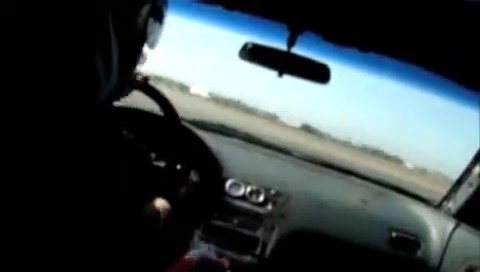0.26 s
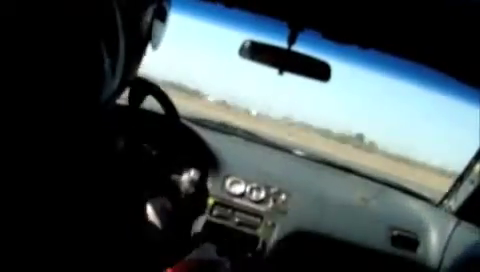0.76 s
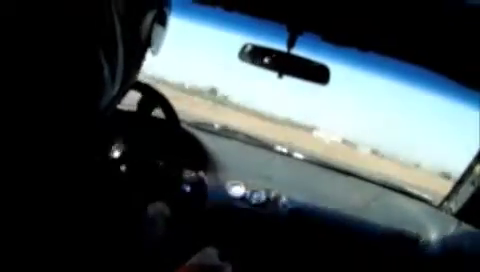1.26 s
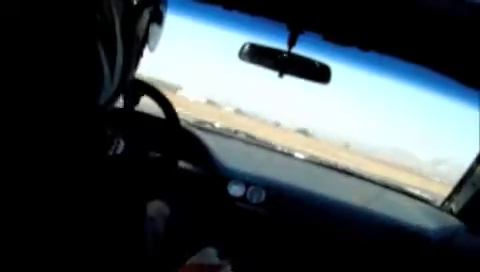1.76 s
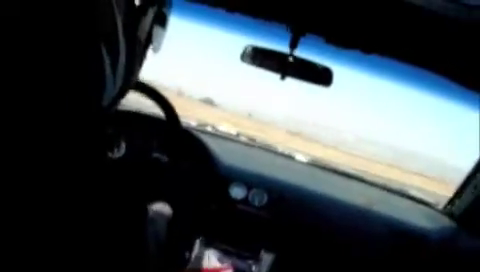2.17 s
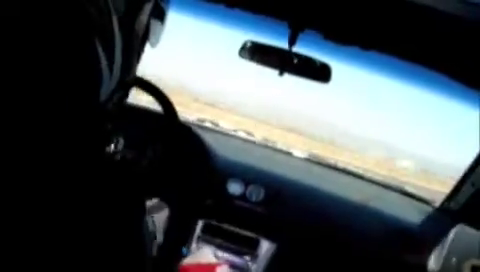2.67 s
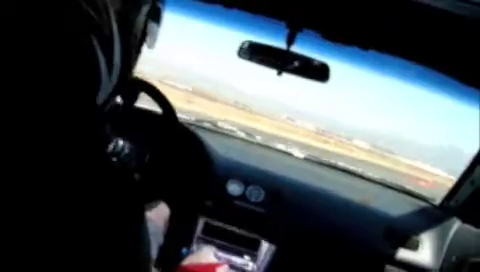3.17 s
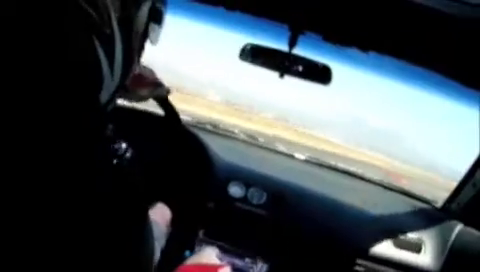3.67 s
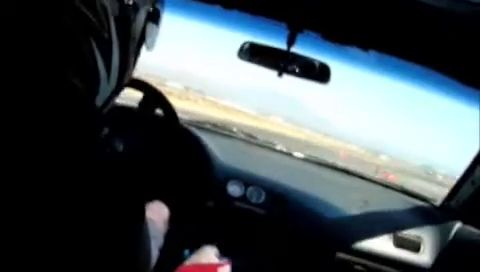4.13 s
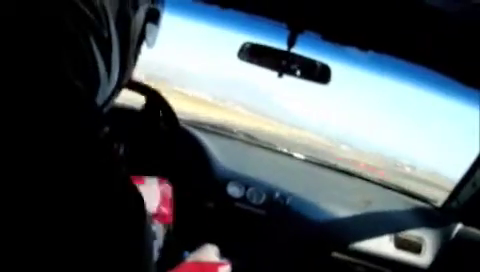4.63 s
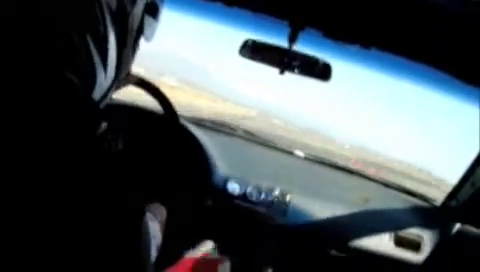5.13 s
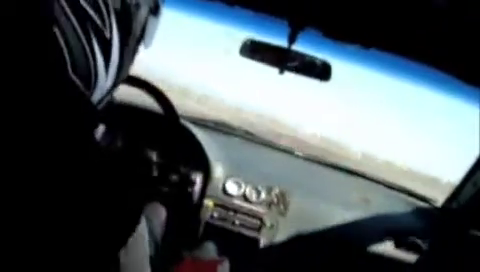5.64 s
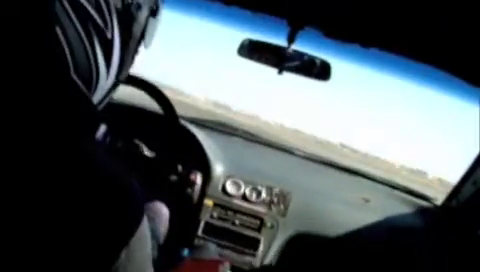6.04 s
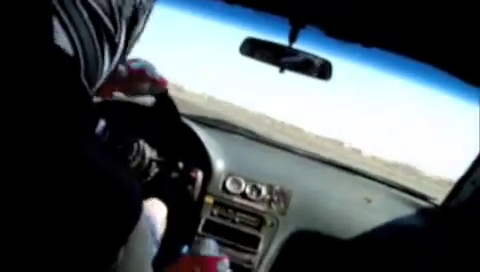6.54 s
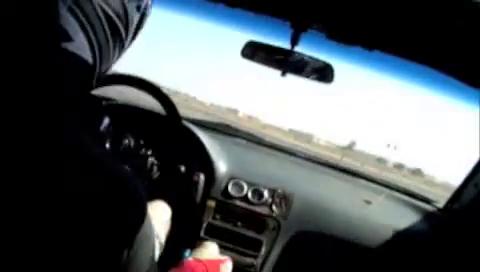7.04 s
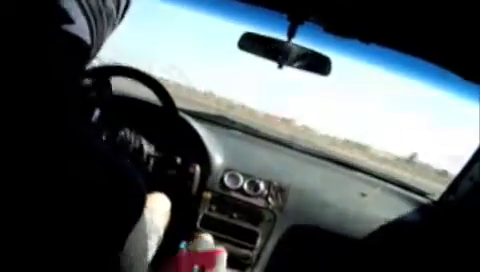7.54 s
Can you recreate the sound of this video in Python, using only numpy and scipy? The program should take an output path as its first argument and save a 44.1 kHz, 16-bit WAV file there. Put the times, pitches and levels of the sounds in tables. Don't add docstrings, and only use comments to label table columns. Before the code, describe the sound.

Long wavering tyre squeal fills a bare cabin above a loud four-cylinder drone, with trim buzzes, floor knocks and a final throttle lift.

```python
import sys
import numpy as np
from scipy import signal
from scipy.io import wavfile
from scipy.ndimage import uniform_filter1d

SR = 44100
rng = np.random.default_rng(int(sys.argv[2]) if len(sys.argv) > 2 else 0)


def put_to_file(sound):
    columns = np.atleast_2d(sound).T
    safe = np.clip(columns, -1, 1)
    whole_steps = np.round(safe * 32767)
    wavfile.write(sys.argv[1], SR, whole_steps.astype(np.int16))


def convert_level_to_amplitude(level_db):
    exponent = np.asarray(level_db, float) / 20
    return 10 ** exponent


N = 343960

# t/s, level/dB, length/s, f/Hz
BUMPS = [(0.107, -44, 0.024, 304), (0.854, -24.5, 0.036, 329.9), (0.967, -32.5, 0.085, 331.4),
         (5.336, -30, .12, 449.6), (6.267, -24.5, 0.13, 748.3), (7.115, -42, 0.046, 100),
         (7.725, -29, 0.1, 900), (7.751, -25, 0.1, 600), (7.399, -53, 0.33, 70), (0.754, -39, 0.091, 4107),
         (1.498, -34, 0.054, 4030), (2.49, -38.5, 0.069, 4470)]
# t/s, level/dB, length/s
RATTLES = [(4.96, -19, 0.018), (4.987, -12, 0.018), (5.044, -17.5, 0.048), (5.486, -11.5, 0.032),
           (5.501, -24, 0.087), (5.5994, -18, 0.025), (5.841, -16, 0.014), (5.86, -12.5, 0.022),
           (5.908, -14, 0.0083), (5.926, -17.5, 0.034), (6.604, -9, 0.028), (6.6624, -13, 0.016),
           (7.641, -24, 0.056), (7.685, -19, 0.0075), (7.721, -21, 0.059)]
# t/s, level/dB
SCRUB_LEVEL = [(0.0, -30.5), (0.95, -26.5), (1.3, -28), (2.52, -27), (2.89, -27.5), (3.82, -27),
               (4.26, -28), (5.08, -28), (5.3, -28), (7.17, -27.5), (7.49, -35), (7.8, -38)]
# f/Hz, level/dB per Hz
SCRUB_SPECTRUM = [(300, -27), (500, -8.5), (800, -3.5), (1300, 3), (1800, 4.5), (2600, -5), (3500, -5.5),
                  (5000, -12.5), (7000, -20), (10000, -25.5)]
# f/Hz, level/dB per Hz
RUMBLE_SPECTRUM = [(25, -24), (50, -24), (80, -20), (110, 12), (240, -10), (330, 6.5), (450, -6.5),
                   (700, 1.5), (1000, -5.5), (2000, -37)]
# middle t/s, half length/s, gain/dB
JOLTS = [(.35, .25, 6), (.66, .06, -6), (.92, .12, 5), (2.95, .2, 1.5), (3.5, .2, 3), (4.2, .08, 4),
         (4.6, .15, 3), (5.45, 0.33, 7.5), (6.32, .08, 5.5), (6.6, .15, 3.5), (7.25, .1, -2),
         (7.8, 0.11, 9)]
# middle t/s, half length/s, squeal drop/dB, grit/dB
RIDGES = [(2.39, 0.013, 9, -1), (2.93, 0.027, 0.5, -1), (4.3, 0.033, 4, -3), (4.41, 0.034, -3.5, 1),
          (4.51, 0.019, -5, 0.5), (4.54, 0.023, 3, 0), (4.66, 0.061, -3, 1), (5.06, .02, -4, -4),
          (6.13, .06, -1, 0.5), (5.02, .03, 7, 9), (5.1, .02, 4, 3.5), (5.49, 0.066, 8, 4),
          (5.88, 0.045, -0.5, 3.5), (6.62, 0.069, 2.5, 4.5), (7.66, .08, 0.1, 6)]
# middle t/s, half length/s, octave gain/dB, scrub gain/dB
BITES = [(.59, 0.032, 13, 0.5), (.8, 0.043, 4, 0), (1.52, 0.045, 8, 2), (1.8, .04, 4, 2),
         (2.5, .05, 1.5, 1), (3.8, 0.11, 2.5, 0.5), (4.3, .04, 7, 1.5), (4.98, .05, 5, 1.5),
         (5.22, .06, -6, 0.5), (6.1, 0.059, 3, 1), (7.63, 0.06, -1, -2), (7.8, 0.083, -2, 5)]
# t/s, f/Hz (cycles per second)
POWER_REVS = [(0.0, 34.76), (0.44, 36.85), (0.67, 36.68), (1.41, 38.1), (1.94, 37.35), (2.72, 37.7),
              (2.97, 38.6), (3.21, 40.38), (3.37, 39.77), (4.18, 41.28), (4.44, 39.8), (4.68, 39.7),
              (5.12, 40.42), (5.69, 43.03), (6.07, 44.05), (6.37, 40.68), (6.94, 44.35), (7.12, 44.0)]
# t/s, f/Hz (cycles per second)
COAST_REVS = [
    (7.172, 39.19),
    (7.41, 33.05),
    (7.588, 31.28),
    (7.708, 32.06),
    (7.8, 34.7),
]
# f/Hz, level/dB
FIRING_BOOM = [(125, -39), (133, -43.5), (142, -41.5), (151, -39.5), (159, -33), (166, -26.5), (176, -28.5)]
# f/Hz, level/dB
OCTAVE_BOOM = [(250, -53), (275, -43), (298, -49.5), (308, -40.5), (320, -34), (332, -27.5), (350, -29.5)]
# middle t/s, half length/s, firing tone drop/dB, octave drop/dB
LIFTS = [
    (.0, .08, 6, 3),
    (1.52, 0.098, 9, 3),
    (2.93, 0.13, 6.5, 0),
    (4.05, 0.27, 3.5, 2.5),
    (4.37, .11, 7, 9),
    (4.6, 0.17, -1, -1),
    (2.7, 0.18, -2, -5.5),
    (6.25, 0.14, 14.5, 3),
    (6.66, 0.067, 9, 6.5),
    (7.12, 0.073, 8, 0),
]
BUZZ_LEVELS = [-29, -36, -10.5, -9.5, -20, -19.5, -10.5, -21.5, -12.5, -3.5, -0.5, -2.5, -10, -6, -4.5, -4,
               -7, -10, -13, -17.5, -10.5]
# f/Hz, width/Hz, level/dB
PANELS = [(729, 40, 3.5), (454.6, 4.4, 7)]
# f/Hz, width/Hz
LOOSE_PANELS = [(562, 11.6), (755, 44)]
LOOSE_LEVELS = [-26, -29]
# middle t/s, half length/s, low panel gain/dB, high panel gain/dB
TWISTS = [(.06, 0.08, 7.5, -12), (.75, .15, -7, -2), (1.5, .12, -6, 2), (2.27, .05, -10, 0.5),
          (3.3, 0.39, -6.5, 1), (4.0, 0.23, -5, -1), (4.43, 0.069, 2, -1), (5.02, .2, 1.5, 10),
          (5.8, .15, 3, 0.5), (6.2, 0.0581, 3.5, -5), (6.47, 0.11, -5, 10.5), (6.82, .06, 3.5, -6)]
# t/s, octave f/Hz, octave level/dB, fundamental level/dB
CHIRP = [
    (7.17, 2310, -34, -16),
    (7.2, 2300, -23, -19),
    (7.3, 2265, -22, -25.5),
    (7.4, 2240, -28.5, -19),
    (7.44, 2249, -19.5, -31),
    (7.475, 2240, -36, -21),
    (7.55, 2215, -26, -27),
    (7.6, 2230, -35, -38),
    (7.64, 2212, -47, -44),
]
# t/s, squeal level/dB, middle f/Hz, pitch spread over the tread/0-1, octave re fundamental/dB
SLIDE = [(0, -16.5, 1390, 0.17, -2), (.16, -14.5, 1126, .12, -7.5), (.42, -15.5, 1373, 0.16, -5),
         (.6, -15.5, 1171, 0.15, -11.5), (.78, -15, 1312, 0.13, -3), (1.0, -16, 1230, .1, -5),
         (1.95, -16, 1225, .11, -5), (2.5, -16, 1312, 0.1, -1), (2.72, -17, 1221, 0.1, -2),
         (3.1, -16.5, 1322, 0.09, -6), (3.8, -19.5, 1369, .06, -1), (4.25, -17.5, 1333, 0.1, -5),
         (5.0, -18.5, 1370, .06, -4.5), (5.5, -20.5, 1278, .12, -12), (6.55, -15.5, 1224, 0.11, -12),
         (6.75, -19, 1341, 0.12, -3), (7.36, -16, 1143, 0.12, -2), (7.6, -20.5, 1140, 0.11, -14)]
# f/Hz, width/Hz, level/dB
CABIN_MODES = [(1053, 44, -2), (1098, 30, 1.5), (1195, 21, -0.5), (1231, 65, -5.5), (1300.4, 21, 1),
               (1394.4, 13, 7.5), (1541, 49, -1.5), (1678, 24, -11), (1975, 23, 7.5), (2109, 24.5, 5.5),
               (2102, 23, 1.5), (2235, 40, 3), (2345, 53, 6), (2434, 44, 0), (2525, 62, 3.5),
               (2693, 15, 12), (2840, 67, -12)]
# f/Hz, width/Hz, depth/0-1
HOLLOWS = [(908, 52, 0.5), (1130, 20, 0), (1196, 20, 0.46), (1955, 133, 0.58), (2094, 63, 0.89),
           (2361, 77, 0.59), (2517, 39, 0.9), (2691, 33, 0.94), (2833, 17, 0.18)]

SHUT_S, SHUT_FALL_S, OPEN_S, OPEN_RISE_S = 7.09, 0.067, 7.7, 0.082
SHUT_BOOM_DB, SHUT_BUZZ_DB = -8, -10
BUZZ_DB, BUZZ_DB_PER_HZ = -33.5, 0.4
THIRD_DB = -54
GRIP_S, GRIP_DB_PER_S = 7.58, -170
WHEEL_HZ, HOP_HZ = 11, 26.0
OCTAVE_SWAY_DB, SURGE_DB = 2, 1.0
TOP_DB, TOP_DB_PER_HZ = -11, 0.35
RUMBLE_DB, RUMBLE_DB_PER_HZ = -48, 0.5
REF_CYCLE_HZ = 40
EDGE_HZ = 10110


def evened(x):
    return x / np.sqrt(np.mean(x ** 2) + 1e-20)


def steady(x, size):
    return x / np.sqrt(abs(uniform_filter1d(x ** 2, size=size)) + 1e-9)


def columns(rows, t=None):
    if t is None:
        t = np.arange(N) / SR
    s, *cols = np.transpose(rows)
    return [np.interp(t, s, c) for c in cols]


def humps(events, t):
    s, half_s, *depths = np.transpose(events)
    coarse = np.arange(0, N / SR + .02, .002)
    bells = np.exp(-((coarse[:, None] - s) / half_s) ** 2)
    return [np.interp(t, coarse, bells @ d) for d in depths]


def read(points, hz):
    f, value = np.transpose(points)
    return np.interp(np.log(hz + 1), np.log(f + 1), value)


def bursts(events):
    shape = np.zeros(N)
    for s, db, length_s in events:
        part = shape[round(s * SR):][:round(2 * length_s * SR)]
        part += convert_level_to_amplitude(db) * np.exp(-(np.arange(len(part)) / SR / length_s) ** 3)
    return shape


def wobble(hz):
    lowpass = signal.butter(2, min(hz, 600), fs=SR / 32, output="sos")
    coarse = signal.sosfilt(lowpass, rng.standard_normal(N // 32 + 2001))[2000:]
    return np.interp(np.arange(N) / 32, np.arange(len(coarse)), evened(coarse))


def hiss(level_db, patchy_db, flicker_db, grit_db):
    frames, hz = N // 128 + 5, np.fft.rfftfreq(512, 1 / SR)[:, None]
    a, b, patches = rng.standard_normal((frames, 257, 3)).T
    patches = uniform_filter1d(patches, size=7, axis=0)
    patches = evened(uniform_filter1d(patches, size=18, axis=1))
    flicker = evened(uniform_filter1d(rng.standard_normal(frames), size=10))
    grit = evened(uniform_filter1d(rng.standard_normal(frames), size=3))
    field_db = level_db(hz, np.arange(frames) * 128 / SR)
    field_db = field_db + patchy_db * patches + flicker_db * flicker
    field_db += grit_db * grit * np.clip(hz / 7000, 0, 1)
    return signal.istft((a + 1j * b) * convert_level_to_amplitude(field_db), nperseg=512, noverlap=384)[1][:N]


def narrow(x, hz, width_hz):
    return signal.lfilter(*signal.iirpeak(hz, hz / width_hz, fs=SR), x)


def ring(x, modes):
    return x + sum(convert_level_to_amplitude(db) * narrow(x, hz, width_hz) for hz, width_hz, db in modes)


def cabin(x):
    for hz, width_hz, depth in HOLLOWS:
        x = x - depth * narrow(x, hz, width_hz)
    return ring(x, CABIN_MODES)


def bumps():
    noise, out = rng.standard_normal(N), 0
    for s, db, length_s, hz in BUMPS:
        band = signal.butter(2, [hz / 2.4, hz * 2.75], "band", fs=SR, output="sos")
        dull = evened(signal.sosfilt(band, noise))
        out = out + uniform_filter1d(bursts([(s, db, length_s)]), size=300) * dull
    return out


def rattles():
    ticks = rng.standard_normal(N) * convert_level_to_amplitude(1.5 * wobble(300))
    band = signal.butter(2, [3800, 9500], "band", fs=SR, output="sos")
    return convert_level_to_amplitude(-12.0) * bursts(RATTLES) * evened(signal.sosfilt(band, ticks))


def roar():
    def scrub_db(hz, t):
        over_hz = columns(POWER_REVS, t)[0] - REF_CYCLE_HZ
        top_db = TOP_DB + TOP_DB_PER_HZ * over_hz + humps(RIDGES, t)[1]
        treble = np.clip(np.log2(hz / 4200 + 1e-9), 0, 1)
        level_db = columns(SCRUB_LEVEL, t)[0] + humps(BITES, t)[1] + 2.99
        return read(SCRUB_SPECTRUM, hz) + level_db + treble * (top_db + 13.5)

    def rumble_db(hz, t):
        over_hz = columns(POWER_REVS, t)[0] - REF_CYCLE_HZ
        return read(RUMBLE_SPECTRUM, hz) + RUMBLE_DB + humps(JOLTS, t)[0] + RUMBLE_DB_PER_HZ * over_hz

    rumble = hiss(rumble_db, 0.38, 1.0, 0)
    rumble = signal.sosfilt(signal.butter(3, 80, "high", fs=SR, output="sos"), rumble)
    scrub = cabin(hiss(scrub_db, 0.96, 0.94, 0.93))
    return convert_level_to_amplitude(-9.0) * scrub + convert_level_to_amplitude(1.0) * rumble


def loose_panels(shake):
    out = 0
    twists_db = humps(TWISTS, np.arange(N) / SR)
    for (hz, width_hz), db, twist_db in zip(LOOSE_PANELS, LOOSE_LEVELS, twists_db):
        out = out + convert_level_to_amplitude(db + twist_db) * narrow(narrow(shake, hz, width_hz), hz, width_hz)
    return out


def engine():
    t, (cycle_hz,) = np.arange(N) / SR, columns(POWER_REVS + COAST_REVS)
    firing_lift_db, octave_lift_db = humps(LIFTS, t)
    shut = np.interp(t, [SHUT_S, SHUT_S + SHUT_FALL_S, OPEN_S, OPEN_S + OPEN_RISE_S], [0, 1, 1, 0])
    dying_db = SHUT_BOOM_DB * shut * np.clip(cycle_hz - 33, 0, 1)
    firing_db = read(FIRING_BOOM, 4 * cycle_hz) - firing_lift_db + dying_db + 0.88 * wobble(3.9)
    octave_db = read(OCTAVE_BOOM, 8 * cycle_hz) - octave_lift_db + dying_db + 1.2 * wobble(3.8)
    buzz_db = BUZZ_DB + BUZZ_DB_PER_HZ * (cycle_hz - REF_CYCLE_HZ) + SHUT_BUZZ_DB * shut

    angle = 2 * np.pi * np.cumsum(cycle_hz * (1 + .0013 * wobble(12))) / SR
    firing = convert_level_to_amplitude(firing_db) * np.sin(4 * angle)
    octave = convert_level_to_amplitude(octave_db) * np.sin(8 * angle)
    third = convert_level_to_amplitude(THIRD_DB + 2.5 * wobble(2.5)) * np.sin(3 * angle)
    boom = np.sqrt(2) * (firing + octave + third)

    multiples = [k for k in range(5, 27) if k != 8]
    lines = [np.sin(k * angle + 2 * np.pi * rng.random()) for k in multiples]
    buzz = sum(convert_level_to_amplitude(db + 1.4 * wobble(2.5)) * line for line, db in zip(lines, BUZZ_LEVELS))
    unpanelled = buzz - sum(narrow(buzz, *mode) for mode in LOOSE_PANELS)
    shake = convert_level_to_amplitude(SHUT_BUZZ_DB * shut) * sum(lines)
    return boom + ring(convert_level_to_amplitude(buzz_db) * unpanelled, PANELS) + loose_panels(shake)


def chirp():
    t, (octave_hz, octave_db, low_db) = np.arange(N) / SR, columns(CHIRP)
    on = np.interp(t, [CHIRP[0][0], CHIRP[1][0] - .01, CHIRP[-2][0], CHIRP[-1][0]], [0, 1, 1, 0])
    angle = np.pi * np.cumsum(octave_hz * (1 + .026 * wobble(140))) / SR
    tones = convert_level_to_amplitude(low_db + 4) * np.sin(angle) + convert_level_to_amplitude(octave_db + 5.5) * np.sin(2 * angle)
    hop = np.sin(2 * np.pi * np.cumsum(HOP_HZ * (1 + .12 * wobble(6.2))) / SR)
    return on * convert_level_to_amplitude(1.8 * wobble(50) + 3.5 * hop) * tones


def squeal(blocks=6):
    t, (level_db, pitch_hz, spread, bite_db) = np.arange(N) / SR, columns(SLIDE)
    surge_db = SURGE_DB * wobble(7.4)
    level_db = level_db + GRIP_DB_PER_S * np.maximum(t - GRIP_S, 0)
    octave_db = level_db + bite_db + humps(BITES, t)[0] + OCTAVE_SWAY_DB * wobble(3.8) - surge_db
    level_db = level_db + surge_db - humps(RIDGES, t)[0]

    low, high = np.zeros((2, N))
    sway = 0.401 * np.tanh(wobble(27.89))
    for place in np.linspace(-1.1, 1.1, blocks):
        hz = pitch_hz * (1 + spread * (place + sway + .22 * wobble(20)) + .016 * wobble(149))
        angle = 2 * np.pi * np.cumsum(hz) / SR
        grip = convert_level_to_amplitude(3.9 * np.tanh(wobble(37)))
        overtones = np.sin(2 * angle) + convert_level_to_amplitude(-7.0) * np.sin(3 * angle) + convert_level_to_amplitude(-21.5) * np.sin(4 * angle)
        low += grip * np.sin(angle)
        high += grip * convert_level_to_amplitude(2.4 * wobble(18)) * overtones

    turn = 2 * np.pi * np.cumsum(WHEEL_HZ * (1 + 0.065 * wobble(2.1))) / SR
    out_of_round = np.sin(turn) + np.sin(2 * turn) + np.sin(3 * turn)
    judder = convert_level_to_amplitude(2.5 * wobble(40) + 0.51 * out_of_round)
    low, high = (steady(cabin(v), size=5000) for v in (low, high))
    return judder * (convert_level_to_amplitude(level_db - 1.0) * low + convert_level_to_amplitude(octave_db - 5.0) * high)


def scene():
    return (bumps() + rattles() + roar() + engine() + chirp() + squeal())[None]


def treble_dropouts(x):
    _, _, z = signal.stft(x, SR, nperseg=256, noverlap=128)
    top = z[0, 28:64].reshape(9, 4, -1)
    power = uniform_filter1d((abs(top) ** 2).mean(1), size=2, axis=1)
    weak = power < .39 * uniform_filter1d(power, size=17, axis=1)
    z[0, 28:64] = (top * np.where(weak, .1, 1)[:, None]).reshape(36, -1)
    return signal.istft(z, SR, nperseg=256, noverlap=128)[1][:, :N]


def low_pass(x):
    return signal.sosfilt(signal.butter(12, 10210, fs=SR, output="sos"), x)


def record(dry):
    held = np.tanh(dry * 0.99) / 1.223
    held = signal.sosfilt(signal.butter(1, 45, "high", fs=SR, output="sos"), held)
    lowpass = signal.firwin(1023, EDGE_HZ, window=("kaiser", 10), fs=SR)
    mix = signal.oaconvolve(treble_dropouts(held), lowpass[None], "same")
    return low_pass(mix)


dry = scene()
out = record(dry)
put_to_file(out)
```